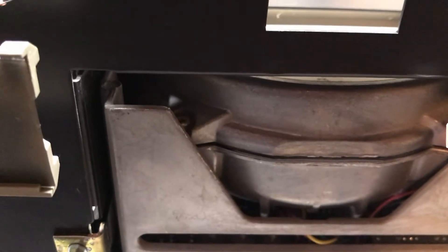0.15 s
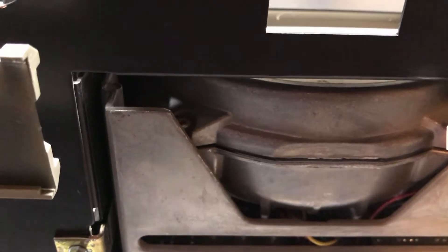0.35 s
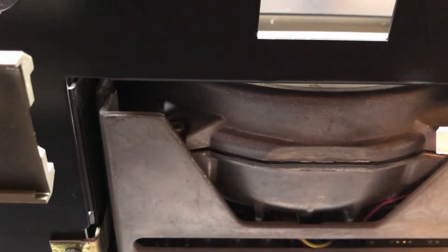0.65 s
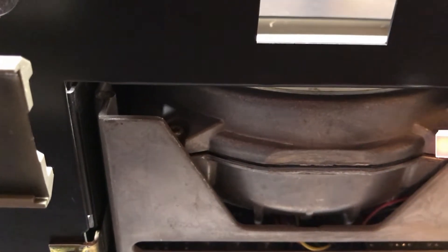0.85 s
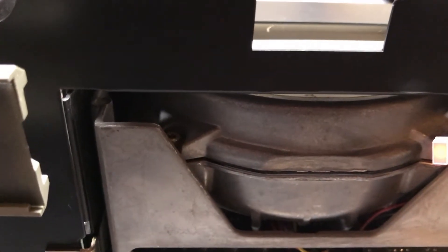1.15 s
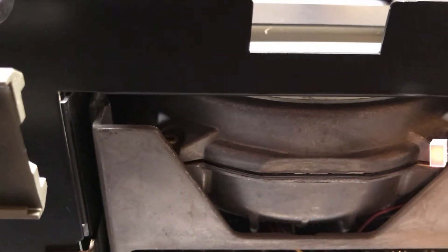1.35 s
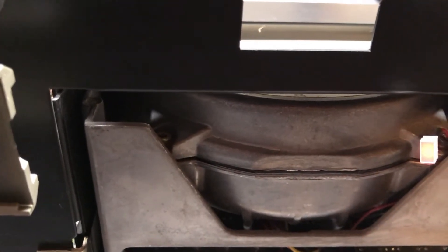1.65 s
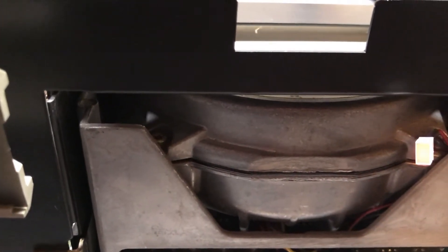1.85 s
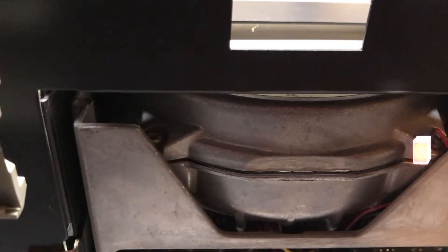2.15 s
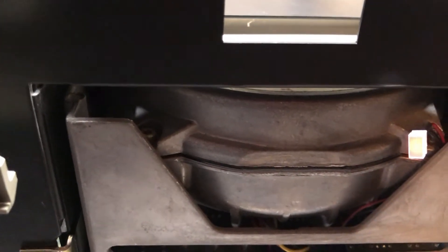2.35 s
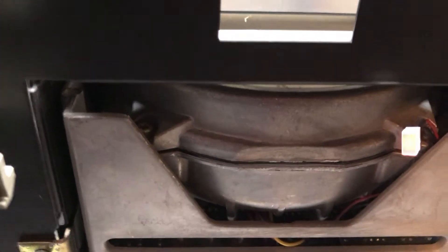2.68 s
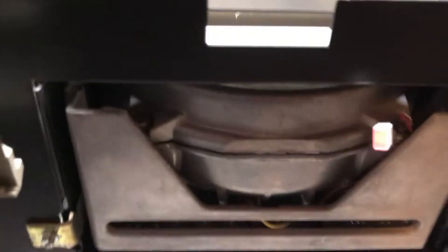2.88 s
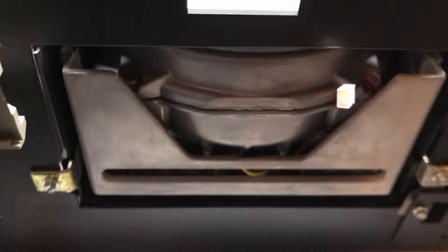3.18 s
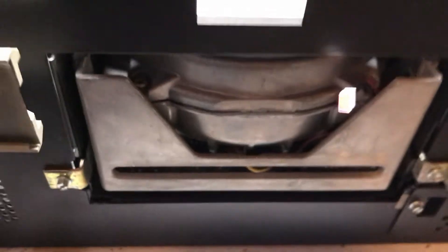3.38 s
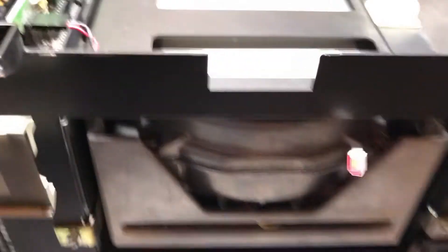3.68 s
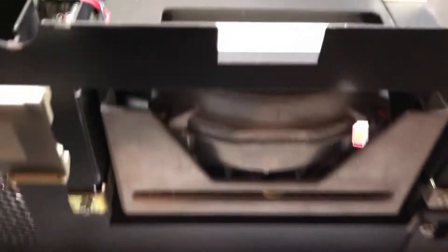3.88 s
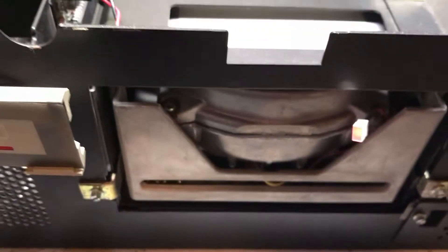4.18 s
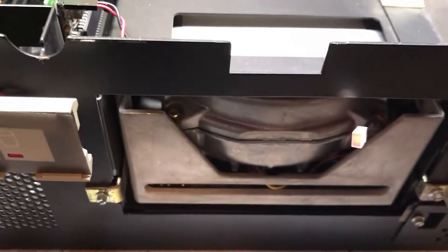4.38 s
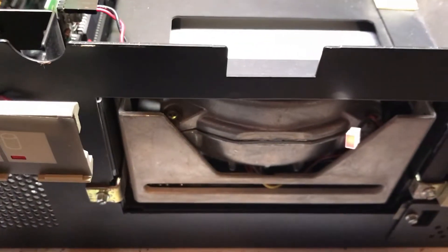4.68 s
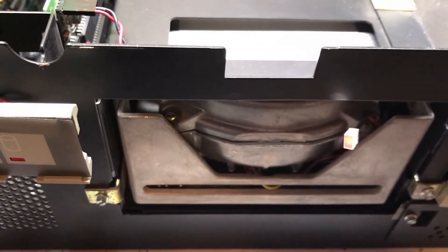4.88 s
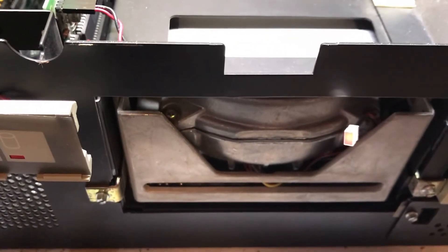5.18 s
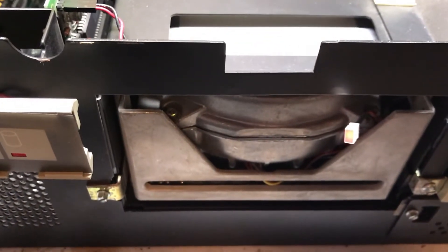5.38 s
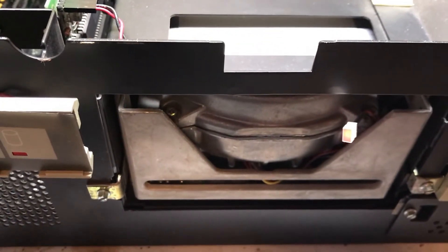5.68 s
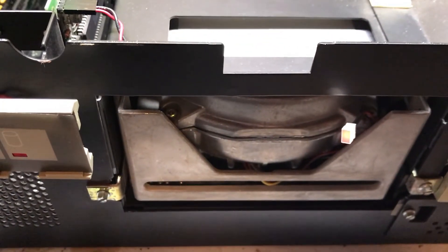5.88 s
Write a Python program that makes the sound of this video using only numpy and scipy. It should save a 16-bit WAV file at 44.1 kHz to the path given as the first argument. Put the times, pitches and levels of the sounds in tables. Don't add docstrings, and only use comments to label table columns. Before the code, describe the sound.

Close-up running computer drive: low hum and airy hiss, bursts of dry head clicks with soft thumps, occasional tiny bearing chirps, piercing faint whine.

```python
import sys
import numpy as np
from scipy import signal
from scipy.fft import rfft, irfft
from scipy.io import wavfile
from scipy.ndimage import uniform_filter1d

SR = 44100
rng = np.random.default_rng(int(sys.argv[2]) if len(sys.argv) > 2 else 0)


def to_linear_factor(level_db):
    exponent = np.asarray(level_db, float) / 20
    return 10 ** exponent


def store_wav(level_fs):
    pcm = np.round(np.clip(np.atleast_2d(level_fs), -1, 1) * 32767)
    wavfile.write(sys.argv[1], SR, pcm.T.astype(np.int16))


N = 266364
T = np.arange(N) / SR
SPINDLE_HZ, LINE_HZ = 60.0012, 15700.7

# (start [s], brake [s], travel level [dB], direction [+1 out, -1 back])
HEAD_SEEKS = [(0.012, 0.028, -41, 1), (0.047, 0.0757, -36.5, -1), (0.3172, 0.3463, -38, 1),
              (0.37, 0.401, -39, -1), (0.629, 0.6572, -38, 1), (0.6857, 0.7226, -40, -1),
              (0.784, 0.8147, -38, 1), (0.839, 0.864, -38.5, -1), (0.933, 0.95, -41, -1),
              (1.5933, 1.624, -38.5, 1), (1.647, 1.663, -40.5, -1), (1.942, 1.9537, -39.5, 1),
              (1.9663, 1.9817, -39.5, -1), (2.2794, 2.2963, -40, 1), (2.309, 2.3377, -38.5, -1),
              (2.696, 2.726, -38, 1), (2.75, 2.77, -41, -1), (3.133, 3.149, -42, 1),
              (3.169, 3.205, -38.5, -1), (3.622, 3.623, -43.5, -1), (3.8575, 3.8907, -39, 1),
              (4.003, 4.04, -40, -1), (4.102, 4.1334, -39, 1), (4.161, 4.157, -49, -1),
              (4.179, 4.205, -39.5, -1)]


def unit(x):
    return x / np.sqrt(np.mean(x ** 2))


def walk(rate_hz):
    k = int(SR / rate_hz)
    held = np.repeat(rng.standard_normal(N // k + 1), k)
    return unit(uniform_filter1d(uniform_filter1d(held, k), k)[:N])


def ring(x, hz, width_hz):
    return signal.lfilter(*signal.iirpeak(hz, hz / width_hz, fs=SR), x)


def tones(rows, base_hz, away, wobble_db, phases={}):
    out, step = np.zeros(N), 2048
    for k, close_db, away_db in rows:
        start = phases.get(k, rng.uniform(0, 2 * np.pi))
        waver = 2 * uniform_filter1d(rng.standard_normal(len(T[::step])), size=4)
        db = close_db + (away_db - close_db) * away[::step]
        if k not in phases:
            db = db + wobble_db * waver
        level = np.interp(T, T[::step], to_linear_factor(db))
        out += np.sqrt(2) * level * np.sin(2 * np.pi * base_hz * k * T + start)
    return out


def spindle(away):
    # (multiple of the spindle rate, close level [dB], away level [dB])
    partials = [(1, -42, -43), (2, -53, -55), (3, -67, -68), (4, -69, -67), (11, -67, -70), (12, -59, -64),
                (24, -68, -72), (25, -73, -71), (28, -72, -77), (29, -76, -73), (30, -77, -75),
                (36, -68, -69), (42, -69, -78), (50, -71, -77), (60, -73, -75), (62, -72, -75),
                (64, -73, -88), (72, -73, -72), (74, -79, -75), (78, -67, -68), (80, -65, -67),
                (82, -74, -79), (84, -62, -65), (86, -60, -64), (88, -72, -73), (90, -77, -70),
                (92, -86, -75), (96, -81, -75), (98, -72, -73), (102, -73, -76)]
    hum_phase = {1: -2.472, 2: -2.805}
    return tones(partials, SPINDLE_HZ, away, 1.8, hum_phase)


def balls(away):
    # (frequency [Hz], close level [dB], away level [dB])
    partials = [(934, -66, -68), (1090, -65, -71), (1401, -70, -70), (1462, -66, -69), (1713, -72, -71),
                (1886, -66, -82), (1930, -66, -70), (2143, -71, -72), (2309, -76, -71), (2567, -71, -70),
                (2703, -81, -71), (2734, -68, -70), (2780, -68, -72), (2885, -75, -72), (2947, -63, -69),
                (3074, -71, -73), (3091, -69, -71), (3159, -69, -65), (3247, -71, -71), (3265, -68, -69),
                (3470, -66, -73), (3496, -64, -67), (3522, -72, -72), (3583, -65, -69), (4644, -84, -70),
                (4856, -70, -82), (6385, -73, -92), (7820, -102, -82), (7880, -102, -85), (8474, -83, -84)]
    return tones(partials, 1, away, 2.1)


def fan(away):
    # (multiple of the base rate, close level [dB], away level [dB])
    partials = [(3, -65, -68), (4, -53, -54), (6, -57, -58), (7, -74, -73), (8, -69, -68), (9, -62, -67),
                (10, -66, -73), (11, -78, -75), (13, -76, -76), (30, -79, -86)]
    return tones(partials, 212.07, away, 0.21)


def motor(motor_away):
    # (multiple of the drive rate, close level [dB], away level [dB])
    partials = [(2, -58, -57), (3, -78, -73), (4, -74, -75), (5, -58, -51), (6, -71, -65), (7, -67, -67),
                (8, -77, -79), (11, -77, -78), (16, -83, -81), (17, -75, -84)]
    return tones(partials, 264.3, motor_away, 0.54)


def repeats():
    turns = [(735, 0.26), (1871, 0.46), (2417, 0.16)]
    return sum(share * np.resize(rng.standard_normal(period), N) for period, share in turns)


def air(away):
    # (frequency [Hz], close density [dB per Hz], away density [dB per Hz])
    colour = np.array([(40, -76, -90), (90, -82.5, -89), (137, -82, -80.5), (375, -85, -86.5),
                       (607, -88.5, -91), (900, -86, -85), (1080, -92.5, -95.5), (1410, -90.5, -90.5),
                       (2240, -91.5, -92.5), (3540, -86.5, -88), (4000, -96.5, -94), (5160, -96.5, -93.5),
                       (7650, -105, -110), (10600, -107, -112)])
    # (frequency [Hz], width [Hz], close level
    # [dB], away level [dB])
    casting = [(396.3, 53, -61, -62), (6460, 280, -68.5, -69), (9220, 1160, -69.5, -69),
               (11160, 560, -73.5, -83), (12700, 2200, -72, -74), (13600, 190, -68.5, -70.5),
               (14000, 900, -72, -78), (5030, 630, -61, -79), (15630, 180, -65, -72)]
    log_hz = np.log(np.maximum(np.arange(N // 2 + 1) * SR / N, 1))
    noise = rfft(rng.standard_normal(N) + repeats()) * np.sqrt(SR / 2)
    close = irfft(noise * to_linear_factor(np.interp(log_hz, np.log(colour[:, 0]), colour[:, 1])), N)
    far = irfft(noise * to_linear_factor(np.interp(log_hz, np.log(colour[:, 0]), colour[:, 2])), N)
    flicker = to_linear_factor(0.5 * walk(6.14))
    hiss = (close + away * (far - close)) * flicker
    for hz, width_hz, close_db, away_db in casting:
        mode = unit(ring(ring(rng.standard_normal(N), hz, width_hz), hz, width_hz))
        hiss += mode * to_linear_factor(close_db + away * (away_db - close_db))
    return hiss


def monitor():
    # (time [s], level [dB])
    whistle = [(0.0, -53), (0.76, -59), (1.98, -53), (2.14, -56), (2.88, -50), (2.98, -52), (3.03, -64),
               (3.11, -46), (3.46, -49), (3.65, -44), (3.83, -54), (4.07, -47), (4.42, -70), (4.59, -52),
               (4.95, -51), (5.21, -53), (5.82, -65), (6.04, -63)]
    level = to_linear_factor(np.interp(T, *np.transpose(whistle)))
    side = to_linear_factor(-71) * np.sin(2 * np.pi * (LINE_HZ - SPINDLE_HZ) * T)
    return np.sqrt(2) * (level * np.sin(2 * np.pi * LINE_HZ * T) + side)


def burst(t, at, rise, fall):
    return np.where(t < at, np.exp(-((at - t) / rise) ** 2), np.exp(-np.maximum(t - at, 0) / fall))


def body(x, modes, scatter_db, broad_db):
    centre_hz = np.mean(np.array(modes)[:, 0])
    modes = [(centre_hz, 5000, broad_db)] + list(modes)
    gains = to_linear_factor(np.array(modes)[:, 2] + scatter_db * rng.standard_normal(len(modes)))
    rms = np.sqrt(np.sum(gains ** 2 * np.array(modes)[:, 1]) * np.pi / SR)
    return sum((-1) ** k * gains[k] * ring(x, hz, w) for k, (hz, w, _) in enumerate(modes)) / rms


def seeks():
    # (frequency [Hz], width [Hz], level [dB])
    arm_modes = [(817, 174, -3), (1103, 69, -1), (1411, 190, -3), (2096, 53, 0), (2334, 96, -1.5),
                 (2650, 72, -0.5), (3015, 58, 0.5), (3304, 60, -2), (3730, 240, -2.5), (4180, 120, -18),
                 (5160, 200, -9.5), (5860, 62, -14), (6270, 350, -13)]
    # (frequency [Hz], width [Hz], level [dB])
    tick_modes = [(3770, 170, 0), (7300, 500, 0), (7700, 480, 0.5), (9100, 280, -10), (9750, 500, -15),
                  (11200, 290, -16), (13750, 400, -13)]
    # (frequency [Hz], width [Hz], level [dB])
    brake_modes = [(3780, 280, -3), (5000, 410, -7.5), (6910, 78, -2), (8650, 850, -10.5),
                   (9570, 640, -7.5), (11240, 250, 0.5), (12400, 300, -11), (13900, 340, -9)]
    sway_modes = [(3730, 130, 0.5), (4050, 160, -10)]
    bend_modes = [(2810, 220, 13), (3100, 270, 2), (2130, 180, 8)]
    knock_modes = [(950, 150, 0), (1120, 150, 0)]
    out, push, span = np.zeros(N + SR), np.zeros(N), SR // 6
    for start, brake, travel_db, way in HEAD_SEEKS:
        first, length = max(int((start - 0.01) * SR), 0), max(brake - start, 1 / SR)
        tick_db, brake_db = (-57, -40.5) if way > 0 else (-47, -41.5)
        braking = to_linear_factor(brake_db) * min(length / 0.005, 1)
        t = (first + np.arange(span)) / SR
        moving = t > start
        slips = rng.random((5, span)) < 2500 / SR
        grit = rng.standard_normal((5, span)) * (0.5 + 3.2 * slips) / 1.1
        fastest = burst(t, brake - 0.31 * length, 0.33 * length, 0.0098) * moving
        speed = (moving * 0.47 + 0.54 * fastest) * burst(t, brake + 0.0044, 1, 0.011)
        tick = burst(t, start + 0.00038, 0.00075, 0.0023)
        stop = burst(t, brake, 0.0042, 0.004)
        stop += 0.25 * burst(t, brake - 0.007, 0.0017, 0.0033) * moving
        sway = burst(t, start + 0.0026, 0.006, 0.0059)
        sway += 0.74 * burst(t, brake + 0.0033, 0.0029, 0.0022)
        bend = fastest ** 2 * min(length / 0.034, 1)
        knock = stop * np.exp(-length / 0.0077)
        arm = to_linear_factor(2.5) * body(grit[0] * (speed + 0.48 * tick), arm_modes, scatter_db=1.5, broad_db=-16)
        arm += to_linear_factor(-5) * body(grit[1] * sway, sway_modes, scatter_db=4, broad_db=-39)
        arm += body(grit[2] * bend, bend_modes, scatter_db=3.5, broad_db=-47)
        arm += to_linear_factor(4) * body(grit[2] * knock, knock_modes, scatter_db=2, broad_db=-30)
        rustle = to_linear_factor(travel_db - 13.5) * speed + to_linear_factor(tick_db + 4.5) * tick
        head = body(grit[3] * rustle, tick_modes, scatter_db=3.5, broad_db=-4)
        head += body(grit[4] * braking * stop, brake_modes, scatter_db=3.5, broad_db=-35)
        out[first:first + span] += to_linear_factor(travel_db) * arm + head
        throw = np.sign(way) * (0.44 + 0.83 * min(length / 0.023, 1))
        push[int((brake - 0.012) * SR)] -= 0.58 * throw
        push[int((brake - 0.004) * SR)] += 1.02 * throw
    return out[:N] + to_linear_factor(-43.5) * chassis(push)


def chassis(push):
    # (frequency [Hz], level [dB], 60 dB decay time [s])
    modes = [(64.9, 2.5, 0.39), (96, 4.5, 0.059), (117, -13, 0.19), (139, -1, 0.52), (178.6, -28.5, 0.23),
             (200, -7.5, 0.3), (241, -5, 0.28)]
    soft = signal.fftconvolve(push, np.hanning(int(0.0021 * SR)) / (0.0016 * SR))[:N]
    t = T[:SR // 2]
    thump = np.zeros(len(t))
    for hz, db, t60 in modes:
        thump += to_linear_factor(db) * np.sin(2 * np.pi * hz * t) * np.exp(-np.log(1000) * t / t60)
    return signal.fftconvolve(soft, thump)[:N]


def panels():
    shiver = np.sqrt(sum(burst(T, brake + 0.033, 0.0085, 0.041) for _, brake, _, _ in HEAD_SEEKS))
    panel_modes = [(147.5, 15, 6), (200, 26, -3), (113, 16, 7)]
    rattle = body(rng.standard_normal(N), panel_modes, scatter_db=5.5, broad_db=-56)
    return to_linear_factor(-49.5) * shiver * rattle


def chirps():
    # (time [s], level [dB], end frequency [Hz])
    squeaks = [
        (0.547, -53, 940),
        (1.097, -49, 977),
        (2.19, -54, 930),
        (3.277, -46, 906),
        (3.803, -44, 950),
        (4.338, -52, 990),
        (4.632, -48, 900),
        (5.428, -47, 954),
        (5.998, -47, 875),
    ]
    out, length, fall_hz = np.zeros(N), 0.042, 61
    for at, db, end_hz in squeaks:
        u = np.clip((T - at) / length + 0.5, 0, 1)
        cycles = length * ((end_hz + fall_hz) * u - fall_hz * u ** 2 / 2)
        out += to_linear_factor(db + 1) * np.sin(np.pi * u) ** 2 * np.sin(2 * np.pi * cycles)
    return out


def scene():
    # (time [s], distance [0 close, 1 backed away], the same as it acts on the motor tones)
    path = [
        (0, 0, -0.14),
        (1.0, 0, 0.025),
        (2.0, 0.02, -0.12),
        (2.7, 0.016, 0.18),
        (3.05, 0.49, -0.57),
        (3.45, 0.26, 0.49),
        (3.9, 0.62, 0.7),
        (4.4, 1, 0.9),
        (5.0, 1, 0.97),
        (6.04, 1, 0.95),
    ]
    s, *shares = np.transpose(path)
    away, motor_away = (np.clip(np.interp(T, s, share), -1, 1) for share in shares)
    hum = spindle(away) + balls(away) + fan(away) + motor(motor_away)
    mix = hum + air(np.maximum(away, 0)) + monitor() + seeks() + panels() + chirps()
    return mix[None]


def gated(x):
    # (frequency [Hz], level [dB])
    threshold = [(13800, -27), (14300, -28), (14450, -24), (15400, -22)]
    hz, _, frames = signal.stft(x[0], SR, nperseg=2048)
    power = np.abs(frames) ** 2
    whistle = power[np.abs(hz - LINE_HZ) < 50].sum(axis=0)
    for low_hz in np.arange(13750, 15400, 215):
        band = (hz >= low_hz) & (hz < low_hz + 215)
        limit = whistle * to_linear_factor(np.interp(low_hz, *np.transpose(threshold))) ** 2
        frames[band] *= power[band].sum(axis=0) > limit
    frames[hz > 15790] = 0
    return signal.istft(frames, SR, nperseg=2048)[1][None, :N]


def low_pass(x):
    return signal.sosfilt(signal.butter(12, 16740, fs=SR, output="sos"), x)


def record(dry):
    bass_cut = signal.butter(4, 37, "high", fs=SR, output="sos")
    mix = gated(signal.sosfiltfilt(bass_cut, dry))
    return low_pass(mix)


dry = scene()
out = record(dry)
store_wav(out)
```